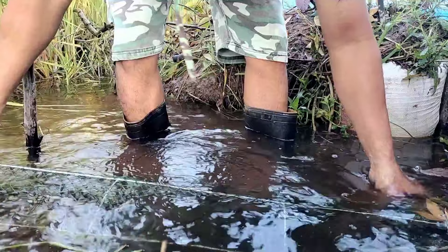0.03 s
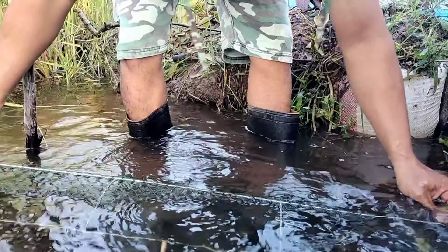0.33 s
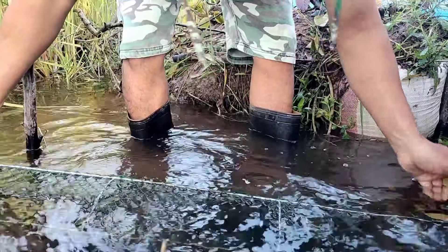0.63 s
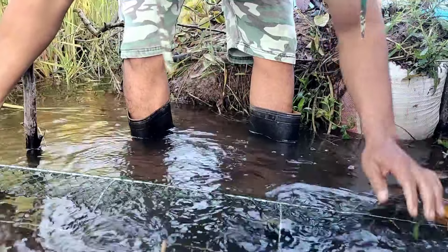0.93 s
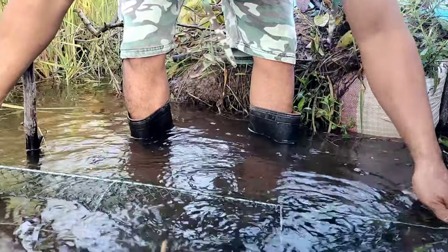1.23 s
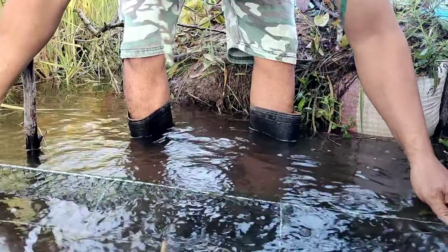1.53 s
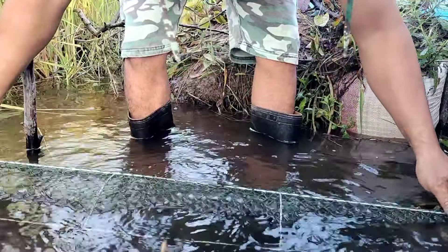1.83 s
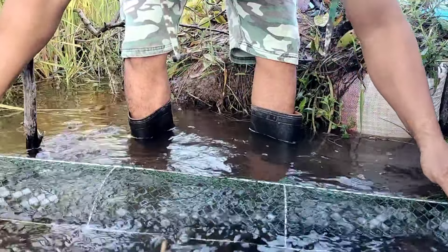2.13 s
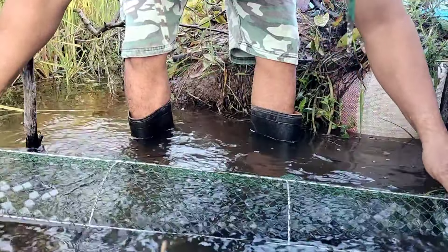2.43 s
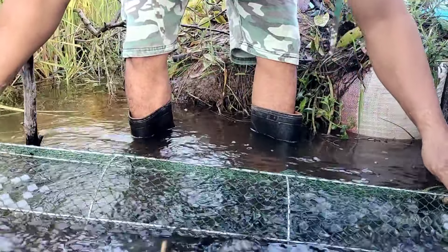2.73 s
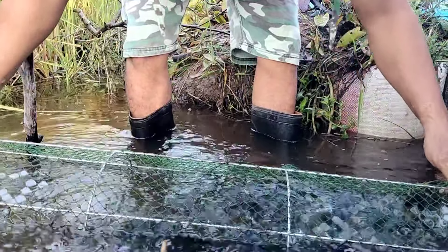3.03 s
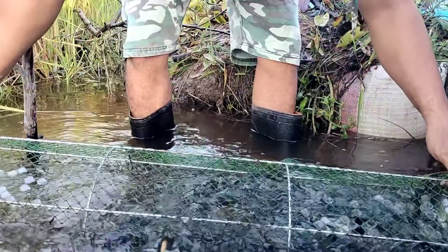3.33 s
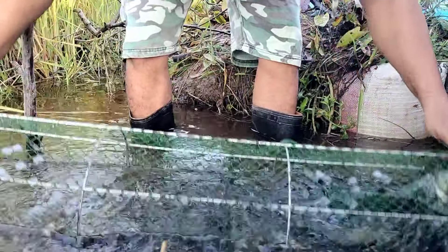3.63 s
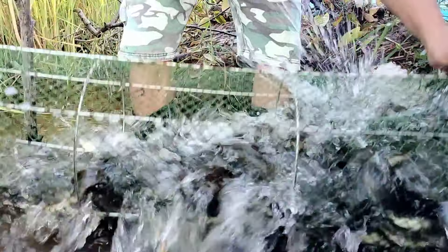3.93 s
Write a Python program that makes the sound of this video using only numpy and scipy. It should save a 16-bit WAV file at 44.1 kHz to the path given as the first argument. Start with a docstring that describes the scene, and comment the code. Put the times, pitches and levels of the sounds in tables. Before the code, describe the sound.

Close water drips and light sloshes come from a fish trap rising out of a shallow creek, with a cluster of loud plops, thin trickles and finally a brief gush. Behind it are distant insects and a low outdoor rumble.

```python
"""At a shallow creek, a mesh fish trap is slowly lifted out of the water, close by.
Insects shrill over a low outdoor rumble, with a faint hum and one far whistle. Water sloshes round
the hands, drips from the frame trap bubbles that chirp upwards, and a few big drops plop back.
At the end the trap breaks the surface and water gushes out through the mesh.
The water is made of two things: ringing bubbles (short tones) and spray or wash (noise)."""
import sys
import numpy as np
from scipy import signal
from scipy.fft import rfft, irfft
from scipy.io import wavfile

SR = 44100
rng = np.random.default_rng(int(sys.argv[2]) if len(sys.argv) > 2 else 0)


def wrap_up_sound(samples):
    """Save the sound to the file named by the first command line argument, as 16-bit audio."""
    columns = np.atleast_2d(samples).T
    # keep every value between -1 and 1, then stretch to whole-number steps
    tamed = np.clip(columns, -1, 1)
    steps = np.round(tamed * 32767).astype(np.int16)
    wavfile.write(sys.argv[1], SR, steps)


N = 176400
TIME = np.arange(N) / SR
AGE = TIME[:SR // 8]  # seconds since one short sound began
EAR_LAG_S = .00012  # typical gap between a sound reaching the left and the right


def from_db(db):
    """Turn decibels into a number to multiply by."""
    return 10 ** (np.asarray(db) / 20)


def rms_one(x):
    """Scale a sound so that its average strength (rms) is one."""
    return x / np.sqrt(np.mean(x ** 2) + 1e-20)


def at_hz(points, hz):
    """Read a table of (pitch, value) rows at any pitch."""
    pitches, values = np.transpose(points)
    return np.interp(np.log(hz), np.log(pitches), values)


def butter(x, hz, kind, order=2):
    """Keep the lows, the highs or a band of a sound."""
    return signal.sosfilt(signal.butter(order, hz, kind, fs=SR, output="sos"), x)


def panned(pan_db):
    """Left and right gains; above zero leans left."""
    return from_db(np.array([[pan_db], [-pan_db]]) / 2)


def add(out, start_s, wave, pan_db, lag_s):
    """Mix a sound in, reaching one ear a little before the other."""
    for channel, gain, at_s in zip(out, panned(pan_db), (start_s - lag_s / 2, start_s + lag_s / 2)):
        stretch = channel[max(int(at_s * SR), 0):][:len(wave)]
        stretch += gain * wave[:len(stretch)]


def dying(ring_s, age=AGE):
    """A fade that falls 60 dB in ring_s seconds."""
    return np.exp(-np.log(1000) * age / ring_s)


# How alike the two ears are: pitch_hz, likeness (1 = the same)
EAR_LIKENESS = [(60, 0.99), (400, 0.71), (1000, 0.2), (2500, 0.051), (12000, 0.03)]
def noise(spectrum):
    """Stereo noise shaped by a table, alike in both ears only in the bass."""
    hz = np.arange(N // 2 + 1) * SR / N + 1e-3
    mid, side = rfft(rng.standard_normal((2, N)))
    alike = at_hz(EAR_LIKENESS, hz)
    ears = np.sqrt(1 + alike) * mid + np.sqrt(1 - alike) * side * [[1], [-1]]
    colour = from_db(at_hz(spectrum, hz)) * np.minimum(hz / spectrum[0][0], 1) ** 2
    return rms_one(irfft(colour * ears, N))


# The tone of the open air: pitch_hz, relative_level_db
AIR_SPECTRUM = [(15, -24), (25, -27), (61, -0.5), (173, -1), (274, -6.5), (349, -15), (871, -23.5),
                (1140, -36), (2170, -38.5), (3260, -33), (4150, -36), (4620, -28), (5730, -43.5),
                (6730, -18), (7700, -35.5), (9050, -40.5), (9810, -51.5), (12800, -43), (15500, -45.5)]
def outdoor_air():
    """A steady low rumble with a thin high hiss and a faint hum."""
    hum_hz = 58.6
    hum = rms_one(np.sin(2 * np.pi * hum_hz * TIME))
    return (from_db(-43.5) * noise(AIR_SPECTRUM) + from_db(-53) * hum) * panned(-1.3)


# Groups of insects: start_s, end_s, pitch_hz, filter_width_hz, level_db, pan_db, pulse_depth_db
INSECT_CHORUSES = [(-.1, 4.1, 6815, 370, -58.5, -6.5, 0.5), (-.1, 7.1, 5130, 690, -79, -19, -2),
                   (-.1, 0.78, 3540, 190, -68, -3.5, 2), (2.26, 2.8, 3504, 190, -66.5, -2, -1),
                   (-.1, 1.76, 8410, 300, -73.5, 9, 0), (.93, 1.405, 2560, 302, -65.5, -6.5, 1)]
def insects():
    """Distant insects, each group a narrow band of noise that flutters and pulses."""
    pulse_hz, flutter_db, fade_s = 8.3, 3.24, 0.024
    pulses = np.cos(2 * np.pi * pulse_hz * TIME)
    out = np.zeros((2, N))
    for start, end, hz, width, db, pan, pulse_db in INSECT_CHORUSES:
        band = [hz - width / 2, hz + width / 2]
        hiss = butter(rng.standard_normal((2, N)), band, "band", order=1)
        shrill = rms_one(butter(hiss, band, "band", order=1))
        flutter = rms_one(butter(rng.standard_normal(N), 20.5, "low"))
        singing = np.clip(np.minimum(TIME - start, end - TIME) / fade_s, 0, 1)
        out += from_db(db + flutter_db * flutter + pulse_db * pulses) * singing * shrill * panned(pan)
    return out


def whistle():
    """One faint whistle that rises and falls, like a far bird."""
    middle_s, half_length_s, top_hz = 0.16, .075, 2770
    off_middle = np.minimum(((TIME - middle_s) / half_length_s) ** 2, 1)
    pitch = top_hz * (1 - 0.131 * off_middle)
    return from_db(-71.5) * (1 - off_middle ** 2) * np.sin(2 * np.pi * np.cumsum(pitch) / SR)


def bank_echo(x):
    """Sound scatters off the water and the banks in a short blur, different in each ear."""
    delay_s = 0.003
    scatter = rng.standard_normal((2, len(AGE))) * dying(ring_s=0.049) * (AGE > delay_s)
    scatter = rms_one(scatter) / np.sqrt(len(AGE))
    return from_db(-7) * signal.fftconvolve(x, scatter, axes=1)[:, :N]


def swarm(start, end, spectrum, level_db, cycles, spread_db, count):
    """Many random bubbles, each ringing for `cycles` waves; level_db(s, hz) sets their strength."""
    out = np.zeros((2, N))
    when, how_high = rng.random((count, 2)).T
    sizes, pans, lags = rng.standard_normal((count, 3)).T
    times = start + (end - start) * (np.arange(count) + when) / count
    pitches = np.interp(how_high, [0, 1], np.sqrt([spectrum[0][0], spectrum[-1][0]])) ** 2
    strengths = from_db(at_hz(spectrum, pitches) + spread_db * np.clip(sizes, -2, 2))
    strengths = rms_one(strengths * pitches ** .25)  # high pitches lie further apart, so lift them
    for s, hz, strength, pan, lag in zip(times, pitches, strengths, pans, lags):
        ring_s = cycles / hz
        age = TIME[:int(ring_s * SR) + 2]
        rise = 1 + 0.078 * age / ring_s  # the pitch creeps up as it rings
        ring = rms_one(np.sin(2 * np.pi * hz * age * rise) * dying(ring_s, age))
        share = np.sqrt((end - start) / count / ring_s)  # overlapping bubbles share the level
        add(out, s, share * strength * from_db(level_db(s, hz)) * ring, 4 * pan, EAR_LAG_S * lag)
    return out


# Thin runs of water: start_s, end_s, level_db
TRICKLE_RUNS = [(0.483, 0.859, -59.5), (2.999, 3.422, -60), (3.569, 3.801, -53)]
# Their tone: pitch_hz, relative_level_db
TRICKLE_SPECTRUM = [(2000, -2.5), (3500, 5), (5500, 9.5), (8000, -2), (12000, -9.5), (15500, -18)]
def trickles():
    """Tiny droplets run off the mesh in a thin crackle."""
    return sum(swarm(start, end, TRICKLE_SPECTRUM, lambda s, hz: db, cycles=24, spread_db=3.5, count=240)
               for start, end, db in TRICKLE_RUNS)


# Stirs of the water: peak_s, rise_s, fall_s, level_db
STIRS = [(.58, .07, 0.17, -55.5), (1.175, .04, .07, -39.5), (1.301, 0.037, 0.13, -60),
         (2.075, .035, 0.062, -40.5), (3.658, .07, 0.1, -51.5)]
# Their tone: pitch_hz, relative_level_db
SLOSH_SPECTRUM = [(210, -24), (350, -23), (504, 2), (563, -12.5), (951, -6.5), (1280, -18), (1600, -13.5),
                  (2670, -7.5), (15500, -30.5)]
def sloshes():
    """Hands and mesh stir the water: small bubbles swell and fade on a soft wash."""
    out, wash = np.zeros((2, N)), noise(SLOSH_SPECTRUM)
    for peak, rise, fall, db in STIRS:
        def swell_db(s, hz=None):
            return db - 10 * np.where(s < peak, ((peak - s) / rise) ** 2 / 2, (s - peak) / fall)
        start, end = peak - 2 * rise, peak + 2 * fall
        bubbles = swarm(start, end, SLOSH_SPECTRUM, swell_db, cycles=23, spread_db=2.5, count=450)
        out += from_db(-2.5) * bubbles + from_db(swell_db(TIME) - 9) * wash
    return out


def wobble():
    """Moving water shakes a bubble, so it rings unevenly."""
    return 1 + 0.38 * rms_one(butter(rng.standard_normal(len(AGE)), 164, "low"))


# Bubbles from the mesh: start_s, length_s, first_pitch_hz, last_pitch_hz, level_db
RISING_BUBBLES = [(0.087, 0.081, 617, 755, -50.5), (0.207, 0.062, 867, 2340, -59),
                  (1.353, 0.029, 790, 1280, -52), (1.542, 0.027, 790, 1350, -63),
                  (2.03, .04, 519, 660, -37), (2.187, .03, 818, 1080, -47), (2.256, 0.05, 392, 630, -44.5),
                  (2.275, 0.011, 1290, 1510, -47), (3.172, 0.031, 1477, 2480, -44.5),
                  (3.203, .036, 717, 980, -45.5), (3.248, 0.021, 700, 1190, -47),
                  (3.361, 0.038, 1422, 1730, -52), (3.606, 0.027, 1275, 1800, -40.5),
                  (3.73, 0.015, 980, 1490, -40), (3.836, 0.016, 735, 1050, -28.5)]
def chirps():
    """Bubbles well up without a splash, sliding higher in pitch until they burst."""
    out, attack_s = np.zeros((2, N)), 0.0036
    for s, length, first_hz, last_hz, db in RISING_BUBBLES:
        progress = np.minimum(AGE / length, 1)
        pitch = first_hz + (last_hz - first_hz) * progress ** 1.8
        tone = np.sin(2 * np.pi * np.cumsum(pitch) / SR)
        swell = (1 - np.exp(-AGE / attack_s)) * (1 - progress ** 2) * wobble()
        add(out, s, from_db(db) * swell * tone, 0, EAR_LAG_S * rng.normal())
    return out


def bubble(hz, doubling_s=0.12):
    """A new bubble starts a little high, settles, then climbs in pitch as it nears the surface."""
    settle_s, attack_s = 0.0084, 0.00046
    pitch = hz * (1 + 0.12 * np.exp(-AGE / settle_s) + (AGE / doubling_s) ** 3)
    return np.sin(2 * np.pi * np.cumsum(pitch) / SR) * (1 - np.exp(-AGE / attack_s))


def spray(top_hz, fade_s):
    """The short burst of hiss where a drop lands."""
    low_hz, attack_s = 1620, 0.00051
    burst = rms_one(butter(rng.standard_normal(len(AGE)), [low_hz, top_hz], "band", order=1))
    return burst * dying(fade_s) * (1 - np.exp(-AGE / attack_s))


# The smallest drops: start_s, pitch_hz, level_db, spray_db, pan_db
DROPLETS = [(.231, 5200, -25.5, -45, -3), (.318, 3940, -40, -60, -2), (.381, 3900, -35.5, -49, 0),
            (.529, 2810, -38, -59, -12), (.563, 5440, -30, -60, -5), (.650, 5100, -35, -55, 2),
            (.813, 3420, -28, -50, -8), (.948, 5460, -38, -47, -2), (1.141, 4170, -25, -39, -2),
            (1.195, 2420, -50, -35, 5), (1.297, 5000, -35, -46, 0), (1.983, 7000, -47, -31, 0),
            (2.050, 3570, -17, -48, 1), (2.096, 6800, -30, -36.5, 2), (2.122, 3380, -23, -50, 4),
            (2.0265, 3260, -17, -48, -2), (2.0278, 4000, -22, -44, 3), (2.157, 5670, -36, -41, 3),
            (2.224, 5370, -25, -45, -1), (2.7306, 4100, -37, -40.5, 2), (2.8098, 5550, -20.5, -37.5, -2),
            (2.812, 2960, -37, -46, -2), (2.811, 3140, -42, -71, -3), (2.843, 6800, -30, -49, -1),
            (2.939, 9600, -34, -67, 0), (3.075, 2180, -39, -41, 2), (3.236, 5300, -41, -52, 2),
            (3.279, 3580, -40, -54, -4), (3.304, 3380, -35.5, -56, 0), (3.3398, 2380, -29, -53, 3),
            (3.141, 3240, -37, -51, -2), (3.172, 5670, -29.5, -46, -2), (3.385, 2060, -26.5, -39, 1.5),
            (3.624, 2980, -31, -55, -6), (3.667, 4180, -37, -57, 2), (3.688, 3430, -25.5, -38, -2)]
def ticks():
    """Droplets tick on the surface: a bright snap of spray and a tiny, high bubble."""
    out, ring_cycles = np.zeros((2, N)), 35.6
    for s, hz, db, spray_db, pan in DROPLETS:
        tone = from_db(db) * bubble(hz) * dying(ring_cycles / hz)
        snap = from_db(spray_db) * spray(top_hz=11700, fade_s=.016)
        add(out, s, tone + snap, pan, EAR_LAG_S * rng.normal() / 2)
    return out


# Drips from the frame: start_s, pitch_hz, level_db, pan_db
FRAME_DRIPS = [(0.561, 1026, -44.5, 1), (1.166, 980, -38.5, -3), (1.196, 1514, -35.5, -5),
               (1.207, 877, -41, -5), (1.224, 2384, -33, 0), (1.294, 1740, -45.5, 0),
               (1.492, 1094, -53.5, -11), (2.408, 2730, -45, 4), (2.813, 1255, -47, -3),
               (2.868, 824, -33.5, -2), (3.077, 1917, -41, -8), (3.359, 1318, -40, 1),
               (3.593, 1167, -32.5, -3), (3.642, 1780, -39, 0), (3.699, 1016, -42, -2),
               (3.715, 877, -39, -6), (3.715, 1990, -39, -1), (3.791, 1392, -28.5, -2),
               (3.808, 976, -33.5, -1)]
def drips():
    """Each drip clicks on the water and traps a bubble that chirps upwards."""
    out, tail_s = np.zeros((2, N)), 0.026
    fade = dying(ring_s=0.02) + from_db(-11.5) * np.exp(-(AGE / tail_s) ** 2)
    for s, hz, db, pan in FRAME_DRIPS:
        tone = bubble(hz) * fade * wobble()
        click = from_db(-11.5) * spray(top_hz=6000, fade_s=.016)
        add(out, s, from_db(db) * (tone + click), pan, EAR_LAG_S * rng.normal())
    return out


# Big drops and air pockets: start_s, pitch_hz, level_db, ring_s, spray_db, pan_db
BIG_DROPS = [(2.0135, 834, -29.5, 0.026, -39, 6), (2.0242, 476, -13, 0.027, -28, 0.5),
             (2.0490, 2314, -14.5, 0.017, -56, 0), (2.0545, 945, -17, 0.013, -39, 2),
             (2.0590, 1130, -14.5, 0.022, -51, -1.5), (2.1198, 660, -13.5, 0.023, -34.5, 0.5),
             (2.1202, 1104, -12.5, 0.013, -57, 0), (2.205, 476, -32, 0.11, -51, 2.5),
             (3.8345, 1860, -26.5, 0.033, -24, -4), (3.838, 3274, -12.5, 0.022, -19, 1),
             (3.855, 414, -27, 0.03, -26.5, 3), (3.964, 5630, -22, .012, -28.5, 0),
             (3.9662, 2530, -17, .012, -25.5, -7), (3.899, 1410, -16, 0.018, -36, -9),
             (3.923, 768, -22.5, 0.15, -33, -3), (3.938, 810, -18.5, 0.056, -34, -1),
             (3.946, 1704, -15.5, 0.026, -46, 2), (3.956, 540, -11.5, 0.032, -23, -2),
             (3.970, 902, -20.5, 0.094, -24.5, 5), (3.994, 378, -14, 0.043, -43, 0)]
def plops():
    """Big drops fall back with a splash and a loud bubble that climbs quickly in pitch."""
    out = np.zeros((2, N))
    for s, hz, db, ring_s, spray_db, pan in BIG_DROPS:
        tone = from_db(db) * bubble(hz, doubling_s=0.061) * dying(ring_s)
        splash = from_db(spray_db) * spray(top_hz=6000, fade_s=0.052)
        add(out, s, tone + splash, pan, EAR_LAG_S * rng.normal())
    return out


# How the gush grows: time_s, gurgle_db, spray_db
GUSH_SWELL = [(3.78, -65, -48), (3.79, -52, -53), (3.812, -47, -35.5), (3.826, -81, -31),
              (3.838, -31.5, -49), (3.872, -50, -36), (3.904, -35.5, -21), (3.94, -28, -24),
              (4.0, -24, -23)]
# Its tone: pitch_hz, relative_level_db
GUSH_SPECTRUM = [(120, -44), (200, -11), (392, -12.5), (575, 0), (755, -7), (890, 4.5), (1050, -16.5),
                 (1740, -10), (2380, -13), (6240, -16.5), (8980, -29.5), (14700, -28.5), (15500, -34)]
def gush():
    """Water pours through the mesh: spray first, then deeper gurgling as the streams thicken."""
    times, gurgle_db, spray_db = np.transpose(GUSH_SWELL)
    split_hz = 1140  # gurgle below, spray above
    def level_db(s, hz):
        return np.interp(s, times, gurgle_db - 0.5 if hz < split_hz else spray_db, left=-np.inf)
    wash = noise(GUSH_SPECTRUM)
    gurgle = from_db(level_db(TIME, 0)) * butter(wash, split_hz, "low", order=3)
    hiss = from_db(level_db(TIME, split_hz)) * butter(wash, split_hz, "high", order=3)
    bubbles = swarm(times[0], times[-1], GUSH_SPECTRUM, level_db, cycles=28.5, spread_db=5.5, count=1300)
    return bubbles + from_db(-5) * (gurgle + hiss)


def scene():
    """The water close by and its echo, over the sounds of the open air."""
    water = plops() + drips() + ticks() + chirps() + trickles() + sloshes() + gush()
    return water + bank_echo(water) + insects() + whistle() + outdoor_air()


def record(dry):
    """Thin out the deepest bass and cut off the very highest treble."""
    low_cut_hz, top_cut_hz = 12.5, 15600
    thinned = butter(dry, low_cut_hz, "high")
    return signal.sosfilt(signal.ellip(10, .2, 80, top_cut_hz, fs=SR, output="sos"), thinned)


dry = scene()
out = record(dry)
wrap_up_sound(out)
```